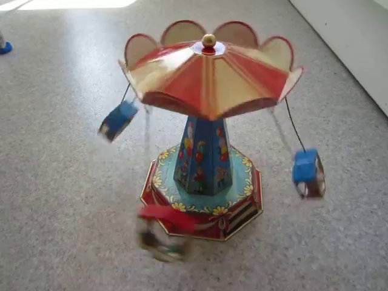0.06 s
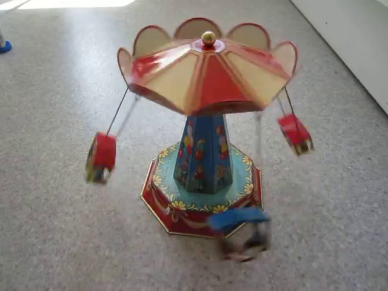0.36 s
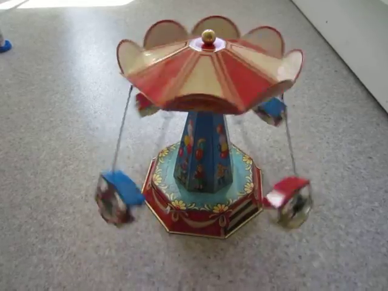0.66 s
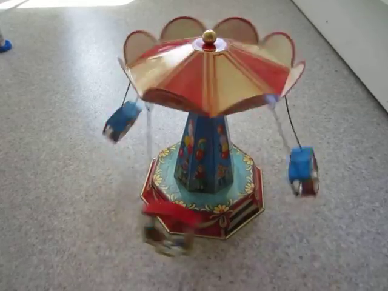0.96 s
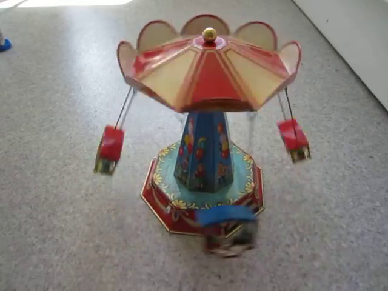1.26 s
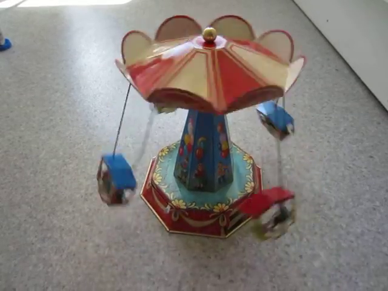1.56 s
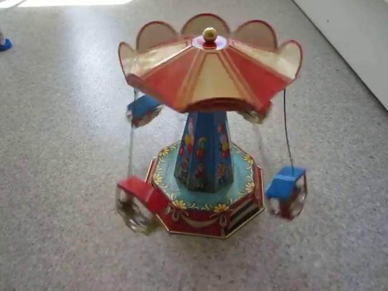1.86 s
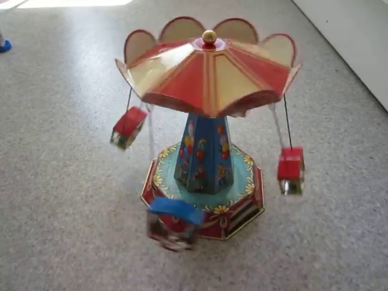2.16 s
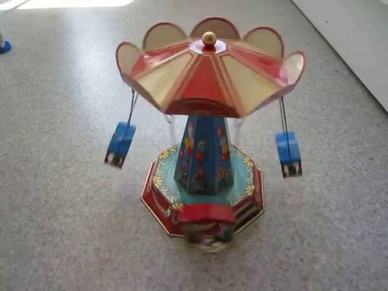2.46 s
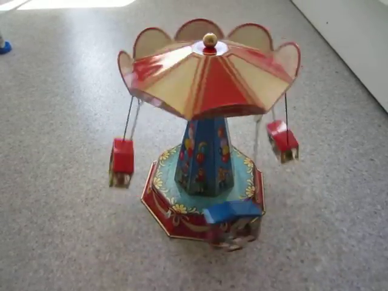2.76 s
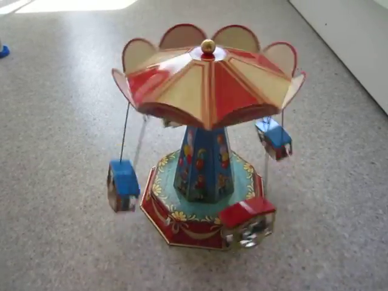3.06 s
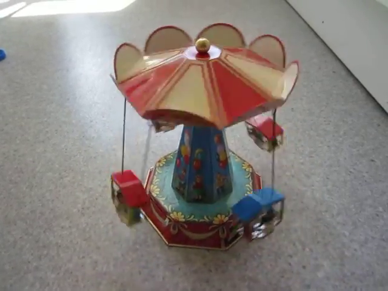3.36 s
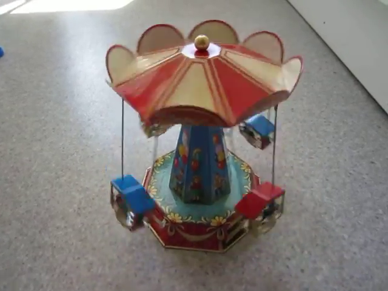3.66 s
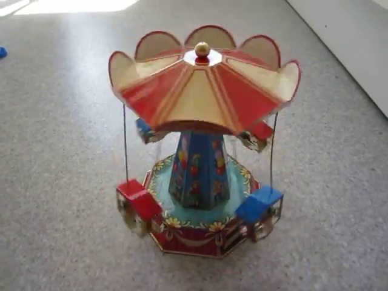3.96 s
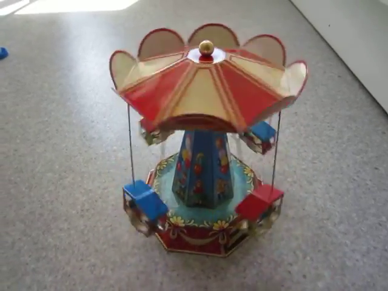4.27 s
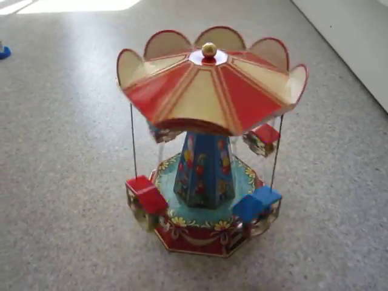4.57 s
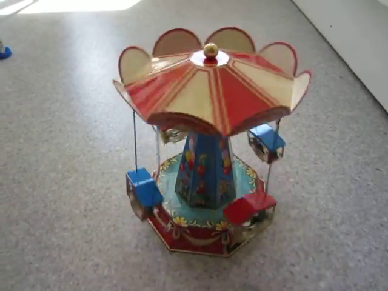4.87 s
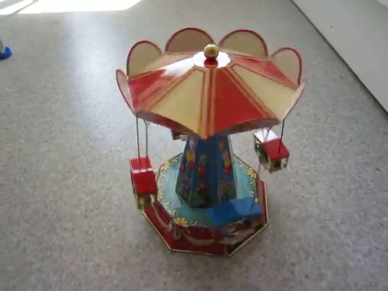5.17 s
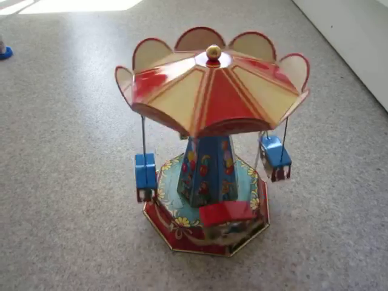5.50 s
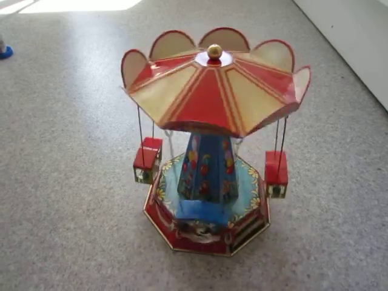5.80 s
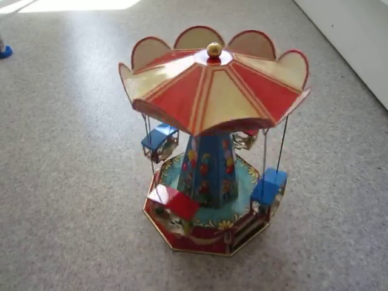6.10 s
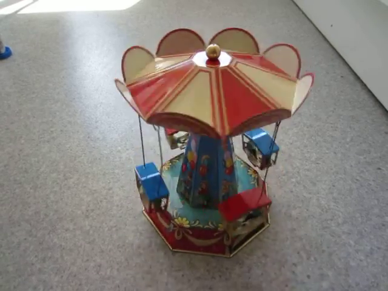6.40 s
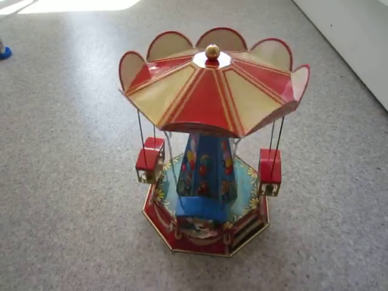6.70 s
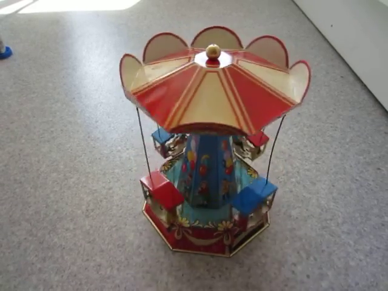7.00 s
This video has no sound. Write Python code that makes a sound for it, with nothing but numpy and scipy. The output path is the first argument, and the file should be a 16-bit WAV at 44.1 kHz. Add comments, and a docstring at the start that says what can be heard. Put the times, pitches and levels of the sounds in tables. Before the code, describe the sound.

A wind-up tin carousel rattles and whirs, slowing to a stop, with microphone handling bumps and one sharp click midway.

```python
"""A wind-up tin carousel runs down on the floor of a small room.
Its loose gears knock about 18 times a second and ring the tin base, roof and steel wheels;
they slow as the spring slackens, then falter and stop. Steady room air lies underneath.
Fingers rub and bump the microphone case; one sharp click overloads it and briefly ducks the gain."""
import sys
import numpy as np
from scipy import signal
from scipy.fft import rfft, irfft, next_fast_len
from scipy.io import wavfile

SR = 44100
rng = np.random.default_rng(int(sys.argv[2]) if len(sys.argv) > 2 else 0)


def unload_audio(sound):
    """Save the sound as a 16-bit wav file, at the path given as the first command line argument."""
    columns = np.transpose(np.atleast_2d(sound))
    # keep every value between -1 and 1, then stretch to whole-number steps
    steps = np.round(np.clip(columns, -1, 1) * 32767)
    wavfile.write(sys.argv[1], SR, steps.astype(np.int16))


N = 315031

# knocking wheel, about 9 turns/s and slowing: t/s, position/turns
WHEEL_TURNS = [(-0.054, -1), (0.053, 0), (0.366, 3), (0.585, 5), (0.7985, 7), (1.116, 10), (1.757, 16),
               (2.093, 19), (2.413, 22), (2.846, 26), (3.071, 28), (3.396, 31), (4.171, 38), (4.386, 40),
               (4.854, 44), (5.075, 46)]
# two double knocks per turn: phase/turns, taut level/dB, slack level/dB, main ring/dB, treble/dB
TURN_KNOCKS = [(0, 0.5, 0, -2, 1.5), (.41, -5.5, -4.5, 2, 0), (.54, -17, -8, -2.5, 3),
               (.86, -15, -4, 0.5, -4)]
# force of the regular knocks: t/s, level/dB
KNOCK_FORCE = [(0, -37), (1.2, -35.5), (1.8, -35), (2.14, -42.5), (2.25, -31), (2.7, -36), (3.15, -38),
               (3.7, -37), (4.1, -34), (4.55, -37), (5.05, -38)]
# gears catching hard or faltering: t/s, level/dB, main ring/dB, treble/dB
GEAR_CATCHES = [(0.0527, -34.5, 2, 4), (0.2109, -32, -15, 3), (0.4134, -32.5, -10, 0),
                (0.5441, -38.5, 6, 3), (0.6299, -37.5, 11, 0), (0.735, -34.5, 5, -3), (0.7992, -34.5, 4, 2),
                (0.9038, -35.5, 6.5, 0), (1.0109, -33, 2.5, 1.5), (1.223, -35.5, -2, 3.5),
                (1.33, -36, 1, 5), (1.5429, -33.5, 1.5, 2.5), (1.5878, -34.5, 5, 0),
                (1.8034, -34, 4.5, 0.5), (1.9411, -36.5, 1, -1), (2.199, -35, -15, 1),
                (2.2425, -32, -6.5, -2), (2.4126, -35, 6, 2), (2.737, -38.5, 11, 6), (2.846, -35, 1, 2.5),
                (2.9135, -33.5, -1, 0), (2.951, -33, -11, -4), (3.4968, -36, 4.5, -4),
                (3.6028, -38, 3.5, -1), (3.6635, -42.5, 9, -8), (3.714, -35, 2.5, -2),
                (3.838, -32.5, 1.5, -1), (3.948, -32, 0.5, -3), (4.6163, -38, 8.5, -0.5),
                (4.738, -37, 5, 2.5), (5.0159, -37, 8, -1.5), (5.0754, -32.5, 6, -0.5),
                (5.1424, -35.5, 2.5, -1), (5.1997, -35, 11, 2), (5.275, -43.5, -15, -3),
                (5.3448, -37, 8, 4.5), (5.4532, -53, 4, -11), (5.5461, -42, -5, 1),
                (5.6278, -42.5, -2, -0.5), (5.6842, -42, -5, -9), (5.8599, -40, 1, -3.5),
                (5.9213, -48, 2.5, 0), (6.037, -46.5, 7.5, 0), (6.0975, -44.5, 7, 4.5),
                (6.169, -48.5, 3, -0.5), (6.518, -61, 9, -2), (7.122, -55.5, 7, -8)]
# fine chatter of the gear train: t/s, level/dB
TOOTH_CHATTER = [(0.0, -36.5), (0.5, -45), (0.65, -45.5), (1.57, -39.5), (2.15, -45.5), (2.25, -36),
                 (2.45, -46.5), (3.5, -43), (4.2, -46.5), (4.5, -44.5), (5.21, -50), (5.37, -56),
                 (5.55, -53.5), (5.8, -59), (6.06, -54.5), (6.46, -65), (7.14, -61)]
# tin base and roof: f/Hz, level/dB
BODY_MODES = [(390, -13), (425, -18), (452, -18), (487, -15), (530, -13), (560, -14), (587, -11),
              (640, -11), (675, -16), (719, -9.5), (895, -17), (1010, -16), (1085, -13), (1141, -7.5),
              (1195, 1.5), (1262, -12), (1305, -11), (1359, -5), (1440, -10), (1534, -2.5), (1580, -9),
              (1627, -11), (1755, -17), (1820, -15), (1914, -19.5), (1955, -18), (2020, -20), (2086, -13),
              (2180, -22), (2367, -17)]
# steel wheels and frame: f/Hz, level/dB
STEEL_MODES = [(2406, -17.5), (2442, -19), (2595, -17.5), (2786, -18), (2837, -18.5), (3066, -22),
               (3150, -23), (3195, -22), (3303, -24), (3457, -28), (3696, -31), (3787, -25), (3854, -28),
               (4247, -30), (4331, -30), (4439, -29), (4608, -31), (4800, -30), (4865, -27), (4912, -27),
               (4950, -25), (5000, -28), (5631, -31), (5728, -30), (6228, -39), (6681, -34)]
# decay of tin and steel modes: f/Hz, t60/s
MODE_DECAY = [(400, 0.21), (1200, 0.13), (2500, 0.18), (5000, 0.1), (7000, 0.14)]
# weak, dense sheet-metal modes: f/Hz, relative density/dB
SHEET_SPECTRUM = [(200, -32), (310, -9.5), (390, -8.5), (700, -0.5), (800, -6), (1000, -1), (1280, -3.5),
                  (1600, -2), (1800, -6), (2700, -9.5), (3600, -17.5), (5000, -22.5), (7500, -31),
                  (12000, -53.5)]
# their decay: f/Hz, t60/s
SHEET_DECAY = [(300, 0.19), (1200, 0.22), (2500, 0.2), (5000, 0.11), (10000, .06)]
# room air and microphone hiss: f/Hz, relative density/dB
AIR_SPECTRUM = [(20, -6), (60, 1), (200, 3.5), (400, 0), (700, 1), (850, -2.5), (1250, -5.5), (2200, -8.5),
                (3800, -17.5), (6500, -19), (10000, -27), (12000, -46), (13500, -33), (15500, -30.5)]
# stereo width of the air: f/Hz, side over mid/dB
AIR_WIDTH = [(60, 6), (110, 8.5), (200, 8), (380, 8), (700, 3.5), (1290, 6.5), (2380, 4), (4400, 2),
             (8120, 0.5), (15000, -1)]
# fingers sliding on the case: t/s, peak/dB, 60 dB rise/s, t60/s
FINGER_RUBS = [(3.15, -57, .5, .3), (3.806, -38.5, 0.016, 0.35), (3.839, -28, 0.019, .11)]
# finger friction: f/Hz, relative density/dB
RUB_SPECTRUM = [(100, 13.5), (500, 3.5), (1600, 7.5), (3000, -5.5), (6000, -14.5), (9500, -27),
                (12000, -43), (15000, -45)]
# small thuds and a tap in the room: t/s, level/dB, f/Hz, t60/s
ROOM_THUDS = [(3.239, -31, 240, 0.026), (5.9035, -39, 180, 0.03), (5.9035, -41, 3940, .0012),
              (5.989, -40, 332, 0.018)]
# dry ticks of the case: t/s, left/dB, right/dB
CASE_TICKS = [(3.8007, -26.5, -37), (4.0555, -34, -16)]
# bumps on the case: t/s, left/dB, right/dB, f/Hz, t60/s
CASE_BUMPS = [(3.8185, -5.5, -11.5, 358, 0.013), (3.8215, -18, -31, 1190, .012),
              (3.8262, -8, -9.5, 80, .05), (3.8385, -8.5, -15, 323, 0.012), (3.8408, -36, -16, 1300, .008),
              (3.872, -20.5, -30, 400, 0.013)]


def from_db(db):
    """Decibels to gain."""
    return 10 ** (np.asarray(db) / 20)


def unit_rms(x):
    """Scale to unit power."""
    return x / np.sqrt(np.mean(x ** 2) + 1e-20)


def at_time(curve, t_s):
    """Curve value on a linear time axis."""
    return np.interp(t_s, *np.transpose(curve))


def at_hz(curve, hz):
    """Curve value on a log-frequency axis."""
    known_hz, values = np.transpose(curve)
    return np.interp(np.log(np.maximum(hz, 1)), np.log(known_hz), values)


def butter(x, kind, hz, order):
    """Butterworth low- or high-pass."""
    return signal.sosfilt(signal.butter(order, hz, kind, fs=SR, output="sos"), x)


def impulses(t_s, sizes):
    """Impulse train."""
    return np.bincount(np.clip(np.round(t_s * SR).astype(int), 0, N - 1), sizes, N) + 1e-18


def ring(force, hz, t60_s):
    """Damped mode: a unit impulse starts a sine of height 1."""
    radius, angle = from_db(-60 / (t60_s * SR)), 2 * np.pi * hz / SR
    return signal.lfilter([0, np.sin(angle)], [1, -2 * radius * np.cos(angle), radius ** 2], force)


def ping(t_s, hz, t60_s):
    """One mode struck once."""
    return ring(impulses(np.array([t_s]), [1.]), hz, t60_s)


def noise(spectrum, weight=np.ones_like):
    """Coloured noise of unit power, then weighted over frequency."""
    size = next_fast_len(N)
    hz = np.fft.rfftfreq(size, 1 / SR)
    colour = unit_rms(from_db(at_hz(spectrum, hz)))
    return irfft(rfft(rng.standard_normal(size)) * colour * weight(hz), size)[:N]


def wheel_knocks(slack_at_s=3.9, dulling_db=1.5, level_spread_db=1.0, ring_spread_db=2.3):
    """Each turn repeats its contacts; as the spring slackens, single knocks turn double and duller."""
    wheel_s, position = np.transpose(WHEEL_TURNS)
    turns = np.arange(position[0], position[-1])
    phase, taut_db, slack_db, main_db, treble_db = np.tile(TURN_KNOCKS, (len(turns), 1)).T
    t_s = np.interp(np.repeat(turns, len(TURN_KNOCKS)) + phase, position, wheel_s)
    slack = np.clip(t_s / slack_at_s, 0, 1)
    scatter = rng.standard_normal((len(t_s), 2))
    level_db = at_time(KNOCK_FORCE, t_s) + taut_db + (slack_db - taut_db) * slack
    level_db += level_spread_db * scatter[:, 0]
    main_db += ring_spread_db * scatter[:, 1]
    return np.column_stack([t_s, level_db, main_db, treble_db - dulling_db * slack])[t_s > 0]


def tooth_chatter(rate_hz=110, gain_db=-8.0, spread_db=4.5, main_db=-.5, treble_db=-2.5):
    """Small teeth touch at random between the knocks."""
    t_s = np.flatnonzero(rng.random(N) < rate_hz / SR) / SR
    level_db = at_time(TOOTH_CHATTER, t_s) + gain_db + spread_db * rng.standard_normal(len(t_s))
    return np.column_stack([t_s, level_db, np.tile([main_db, treble_db], (len(t_s), 1))])


def gear_contacts(reach_s=.02, bounce_s=.006, bounce_db=-10.5):
    """Knocks, rebounds and chatter, columns as GEAR_CATCHES; a catch replaces knocks within reach."""
    regular, catches = wheel_knocks(), np.array(GEAR_CATCHES, float)
    clear = np.abs(regular[:, :1] - catches[:, 0]).min(axis=1) > reach_s
    knocks = np.vstack([regular[clear], catches])
    rebounds = knocks.copy()
    rebounds[:, 0] += bounce_s * (.5 + rng.random(len(knocks)))
    rebounds[:, 1] += bounce_db
    return np.vstack([knocks, rebounds, tooth_chatter()])


def force_db(contacts, hz, bass_knee_db=-39, bass_loss_db_per_db=0.39):
    """Contact strength at one frequency: where and how hard it lands favours main ring or treble."""
    _, level_db, main_db, treble_db = contacts.T
    bass_db = -bass_loss_db_per_db * np.maximum(level_db - bass_knee_db, 0)
    bass_band = np.interp(hz, [900, 1100], [1, 0])
    main_band = np.interp(hz, [1000, 1130, 1250, 1330], [0, 1, 1, 0])
    treble_band = np.interp(hz, [1800, 2200], [0, 1])
    return level_db + bass_db * bass_band + main_db * main_band + treble_db * treble_band


def metal_ring(modes, contacts, gain_db, spread_db, travel_s=.003):
    """Each contact crosses the sheet and reaches each mode with its own delay and strength."""
    out = np.zeros(N)
    for hz, mode_db in modes:
        scatter_db = spread_db * rng.standard_normal(len(contacts))
        sizes = from_db(force_db(contacts, hz) + mode_db + scatter_db)
        arrival_s = contacts[:, 0] + travel_s * rng.random(len(contacts))
        out += ring(impulses(arrival_s, sizes), hz, at_hz(MODE_DECAY, hz))
    return from_db(gain_db) * out


def sheet_clatter(contacts, gain_db=-5.5, build_s=0.00039):
    """Countless weak modes blur into noise that builds fast and dies band by band."""
    out = np.zeros(N)
    edges_hz = [150, 600, 1000, 1750, 3400, 6500, 15000]
    build = np.exp(-1 / (build_s * SR))
    for low_hz, high_hz in zip(edges_hz, edges_hz[1:]):
        centre_hz = np.sqrt(low_hz * high_hz)
        decay = from_db(-120 / (at_hz(SHEET_DECAY, centre_hz) * SR))   # -120: energy, not amplitude
        kicks = impulses(contacts[:, 0], from_db(force_db(contacts, centre_hz)) ** 2)
        energy = signal.lfilter([1], [1, -decay], kicks)
        energy = signal.lfilter([1 - build], [1, -build], energy)
        out += np.sqrt(energy) * noise(SHEET_SPECTRUM, lambda hz: (hz >= low_hz) & (hz < high_hz))
    return from_db(gain_db) * out


def carousel(contact_hz=7800, radiation_hz=338):
    """Gear contacts ring tin and steel; the small body radiates little bass."""
    contacts = gear_contacts()
    tin = metal_ring(BODY_MODES, contacts, gain_db=-2, spread_db=1.5)
    steel = metal_ring(STEEL_MODES, contacts, gain_db=-2, spread_db=3.0)
    ringing = butter(tin + steel, "low", contact_hz, order=3)   # contact time rounds the attack
    return butter(ringing + sheet_clatter(contacts), "high", radiation_hz, order=4)


def room(x, t60_s=0.13, wet_db=-12.5, first_echo_s=0.0033):
    """Adds a short diffuse tail, different per channel."""
    t_s = np.arange(SR // 2) / SR
    tail = rng.standard_normal((2, len(t_s))) * from_db(-60 * t_s / t60_s) * (t_s > first_echo_s)
    tail = unit_rms(tail) / np.sqrt(len(t_s))
    return x + from_db(wet_db) * signal.fftconvolve(x[None], tail, axes=1)[:, :N]


def air(mid_db=-59.5):
    """Steady room noise and hiss, wide in the bass."""
    side = noise(AIR_SPECTRUM, lambda hz: from_db(at_hz(AIR_WIDTH, hz)))
    return from_db(mid_db) * (noise(AIR_SPECTRUM) + side * [[1], [-1]])


def finger_rubs(right_db=-20.0):
    """Friction on the case, mostly left; each slide swells and dies."""
    t_s = np.arange(N) / SR
    envelope = sum(from_db(peak_db - 60 * np.maximum((peak_s - t_s) / rise_s, (t_s - peak_s) / t60_s))
                   for peak_s, peak_db, rise_s, t60_s in FINGER_RUBS)
    return envelope * noise(RUB_SPECTRUM) * from_db([[0], [right_db]])


def thuds(low_cut_hz=120):
    """Small impacts in the room, one damped mode each."""
    impacts = sum(from_db(db) * ping(t_s, hz, t60_s) for t_s, db, hz, t60_s in ROOM_THUDS)
    return butter(impacts, "high", low_cut_hz, order=2)


def case_bumps(tick_hz=6600, tick_t60_s=0.0033):
    """Ticks and bumps briefly ring the microphone case."""
    ticks = [(*tick, tick_hz, tick_t60_s) for tick in CASE_TICKS]
    return sum(ping(t_s, hz, t60_s) * from_db([[left_db], [right_db]])
               for t_s, left_db, right_db, hz, t60_s in ticks + list(CASE_BUMPS))


def sharp_click(t_s=4.0553, recoil_db=-17.0, left_db=2.5, right_db=15.5):
    """Hard click at the microphone: a short swing as the case springs back."""
    swing = butter(ping(t_s, hz=1350, t60_s=.0017), "low", hz=3400, order=1)
    recoil = from_db(recoil_db) * ping(t_s, hz=185, t60_s=0.0079)
    return butter(swing - recoil, "high", hz=120, order=2) * from_db([[left_db], [right_db]])


def scene(pan_db=1.0):
    """Toy and thuds slightly left in the room; handling noise dry."""
    in_room = room(carousel() + thuds()) * from_db([[pan_db], [-pan_db]])
    handling = finger_rubs() + case_bumps() + sharp_click()
    antiphase = [[-1], [1]]   # the case pushes the two capsules opposite ways
    return in_room + handling * antiphase + air()


def record(dry, threshold_db=-1.5, attack_s=0.015, release_db_per_s=28.5, cutoff_hz=16000):
    """Gain control ducks after a peak and creeps back; overload clips; the top is cut."""
    peak_db = 20 * np.log10(np.abs(dry).max(axis=0) + 1e-9)
    over_db = np.maximum(peak_db - threshold_db, 0)
    ramp_db = release_db_per_s * np.arange(N) / SR
    held_db = np.maximum.accumulate(over_db + ramp_db) - ramp_db
    lag = np.exp(-1 / (attack_s * SR))
    duck_db = signal.lfilter([1 - lag], [1, -lag], held_db)
    clipped = np.clip(dry * from_db(-duck_db), -1, 1)
    return signal.sosfilt(signal.ellip(10, .1, 70, cutoff_hz, fs=SR, output="sos"), clipped)


dry = scene()
out = record(dry)
unload_audio(out)
```